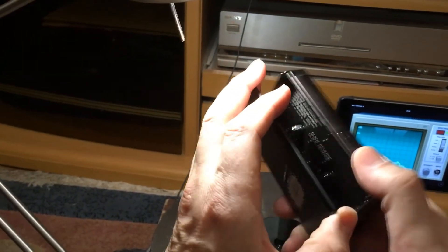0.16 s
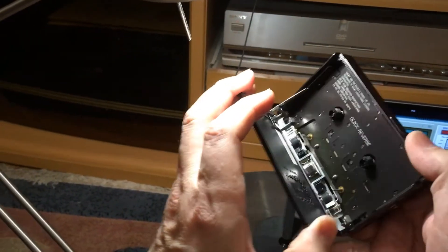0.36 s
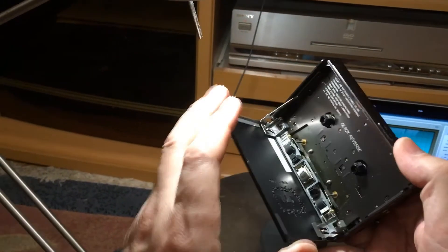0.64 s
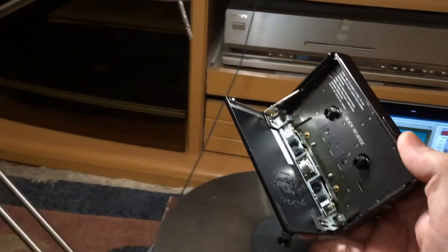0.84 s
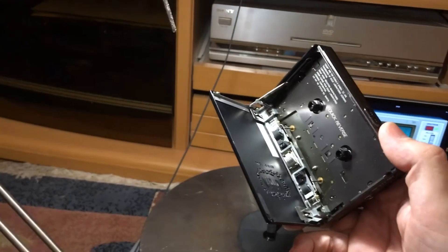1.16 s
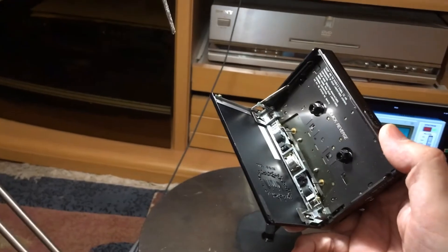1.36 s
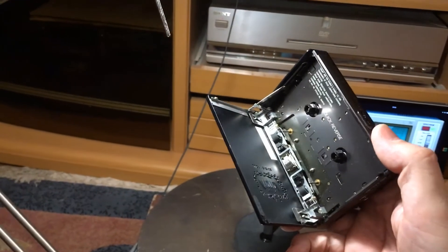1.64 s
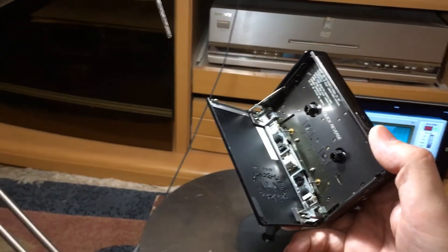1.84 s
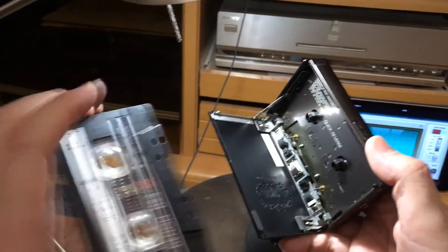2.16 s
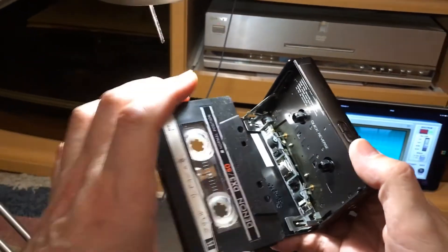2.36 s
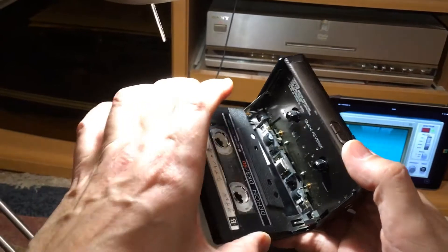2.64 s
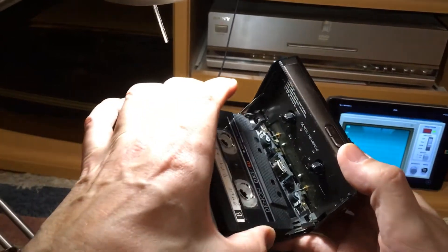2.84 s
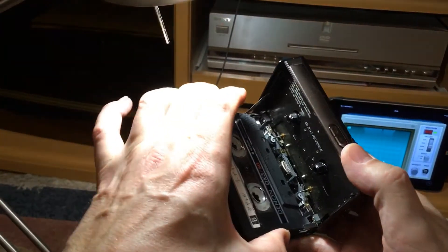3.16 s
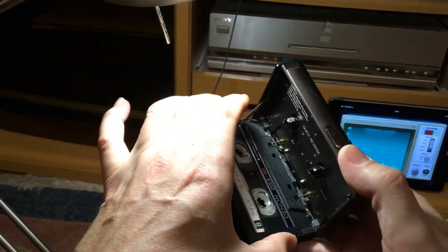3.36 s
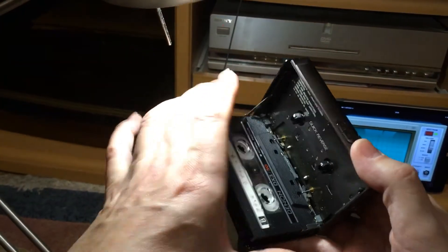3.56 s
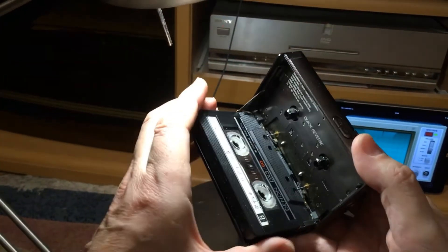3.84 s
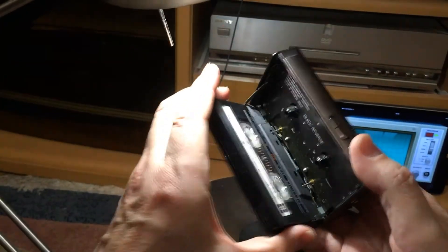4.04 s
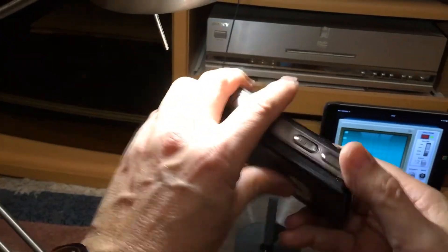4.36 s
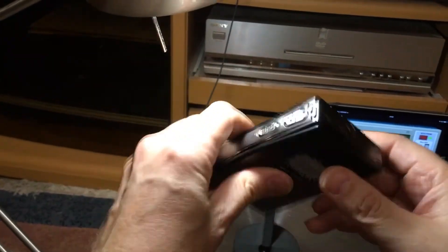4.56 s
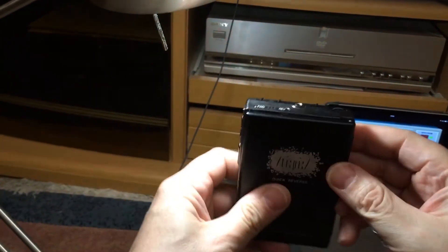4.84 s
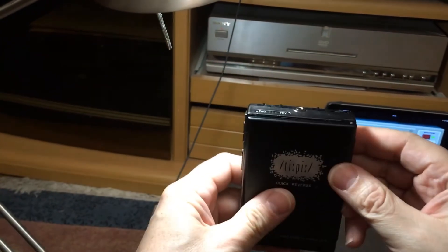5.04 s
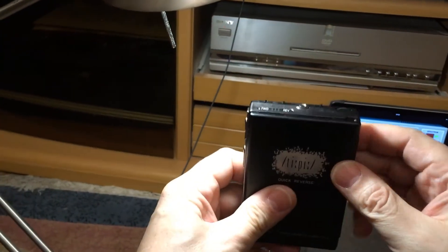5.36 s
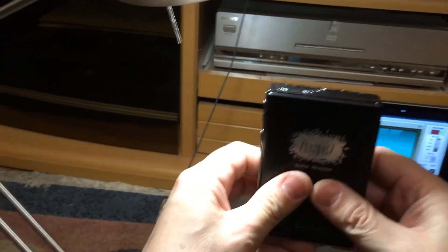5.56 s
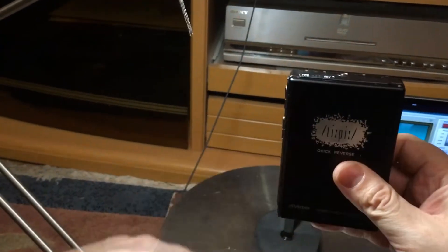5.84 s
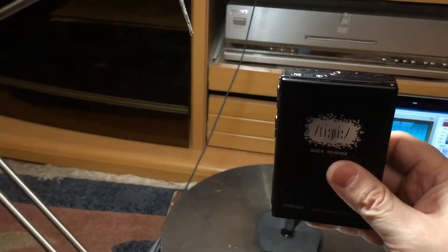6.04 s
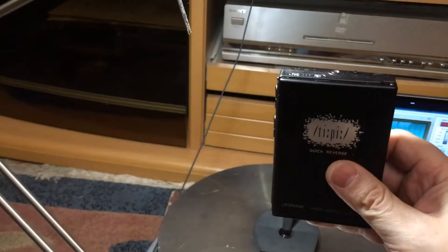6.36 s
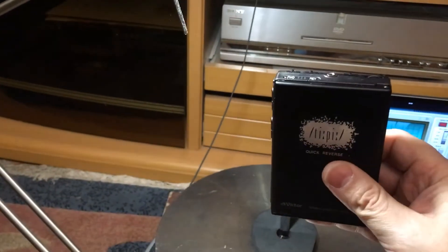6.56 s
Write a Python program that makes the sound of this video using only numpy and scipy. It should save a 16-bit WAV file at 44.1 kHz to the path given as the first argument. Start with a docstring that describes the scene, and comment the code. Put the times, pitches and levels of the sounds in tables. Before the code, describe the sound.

A hand rubs over a pocket cassette player and its latch opens with a sharp, bright click. Small plastic ticks follow as the door is handled. A cassette slides in with a brief hollow clatter and scrape, then fingers brush the case and the door shuts with a firm snap. A few lighter clicks trail off. The sounds are close, over the faint rumble and hiss of a small quiet room.

```python
"""A finger brushes plastic over the rumble and hiss of a quiet room: a hand opens a pocket cassette
player, fetches a cassette, slides it into the door and shuts it. Latches, door and cassette click in
bursts of micro-impacts; skin and plastic rub by stick-slip. Both ring one hollow shell, and small
parts ring at their own pitch. The floor thumps softly once; a faint whine enters near the end."""
import sys
import numpy as np
from scipy import signal
from scipy.fft import rfft, irfft
from scipy.io import wavfile

SR = 44100
rng = np.random.default_rng(int(sys.argv[2]) if len(sys.argv) > 2 else 0)


def store_wav(level_fs):
    """Save 16-bit WAV to argv[1]."""
    pcm = np.round(np.clip(np.atleast_2d(level_fs), -1, 1) * 32767)
    wavfile.write(sys.argv[1], SR, pcm.T.astype(np.int16))


N = 295451
TIME_S = np.arange(N) / SR
REGISTER_EDGES_HZ = (520, 2200, 7000, 16500)   # three registers: hollow, plastic, bright


def from_db(db):
    """Decibels to gain."""
    return 10 ** (np.asarray(db) / 20)


def unit_rms(x):
    """Scale to rms 1."""
    return x / np.sqrt(np.mean(x ** 2) + 1e-20)


def drift(rate_hz):
    """Smooth random wander, rms about 1."""
    step, warmup = 40, 2000
    pole = np.exp(-2 * np.pi * rate_hz * step / SR)
    noise = rng.standard_normal(N // step + warmup + 2)
    slow = signal.lfilter([1], [1, -2 * pole, pole * pole], noise)[warmup:]
    return np.interp(np.arange(N) / step, np.arange(len(slow)), unit_rms(slow))


def band(x, low_hz, high_hz):
    """Butterworth band-pass."""
    return signal.sosfilt(signal.butter(3, [low_hz, high_hz], "band", fs=SR, output="sos"), x)


def ring(force, hz, t60_s):
    """One damped mode; about unit power gain for white force."""
    pole, angle = from_db(-60 / (t60_s * SR)), 2 * np.pi * hz / SR
    gain = np.sin(angle) * np.sqrt(2 * (1 - pole * pole))
    return signal.lfilter([0, gain], [1, -2 * pole * np.cos(angle), pole * pole], force + 1e-18)


def coloured_noise(spectrum):
    """Noise shaped by (Hz, dB) points, rms 1."""
    hz = np.maximum(np.arange(N // 2 + 1) * SR / N, 1)
    points_hz, points_db = np.transpose(spectrum)
    gain = from_db(np.interp(np.log(hz), np.log(points_hz), points_db))
    return unit_rms(irfft(rfft(rng.standard_normal(N)) * gain, N))


def room_tail(x, db, t60_s):
    """Diffuse tail of a small furnished room; the first wall answers after 4 ms."""
    t = np.arange(SR // 2) / SR
    tail = rng.standard_normal(len(t)) * from_db(-60 * t / t60_s) * (t > 0.004)
    return from_db(db) * signal.fftconvolve(x, tail / np.sqrt(np.sum(tail ** 2)))[:N]


# Rumble level. Each row: time in seconds, level in dB.
RUMBLE_LEVELS = [(0.0, -61), (1.06, -59.5), (1.34, -56), (1.68, -63), (1.9, -65.5), (2.29, -56),
                 (3.23, -61.5), (3.73, -65), (4.18, -60), (4.57, -62.5), (4.7, -68), (4.94, -65.5),
                 (5.39, -59.5), (5.76, -56), (6.12, -64.5), (6.7, -60)]
# Rumble spectrum. Each row: frequency in Hz, relative density in dB.
RUMBLE_SPECTRUM = [(20, -26), (33, -17), (45, -2.5), (54, 5), (70, -5), (100, -3), (160, -11), (217, -8),
                   (400, -20.5), (650, -28.5), (1500, -46.5)]


def rumble(waver_db):
    """Low room noise; the level wavers slowly about its curve."""
    level_db = np.interp(TIME_S, *np.transpose(RUMBLE_LEVELS)) + waver_db * drift(1.7)
    return from_db(level_db) * coloured_noise(RUMBLE_SPECTRUM)


# Hiss spectrum. Each row: frequency in Hz, relative density in dB.
HISS_SPECTRUM = [(200, -41), (350, 3), (1500, -3), (3500, -7.5), (5000, -10), (8000, -10.5), (10500, -10.5),
                 (13000, -7), (15500, -9), (16000, -39.5)]


def hiss(rms_db):
    """Steady broadband background."""
    return from_db(rms_db) * coloured_noise(HISS_SPECTRUM)


# Modes of shell, door and mechanism. Each row: frequency in Hz, gain in dB, t60 in seconds.
SHELL_MODES = [(570, -29, 0.086), (1057, -12, 0.075), (1337, -2.5, .025), (1473, 2, 0.059),
               (1615, 0.5, 0.042), (2090, -2, 0.018), (2553, -2.5, 0.017), (2928, -4, 0.015),
               (3454, -2.5, 0.01), (3710, -3, 0.0081), (4290, -4, 0.0055), (4600, -9, .01),
               (5503, -14, 0.012), (5964, -18, 0.015), (6905, -25, 0.012), (8250, -4.5, 0.0056),
               (9600, -5.5, 0.018), (10350, -15.5, 0.0091), (11420, -18.5, 0.015), (11000, -12, 0.015),
               (12160, -11, 0.015), (14000, -14.5, 0.0036), (15100, -24.5, 0.011)]


def shell_modes(register):
    """The shell's resonances within one register."""
    low_hz, high_hz = REGISTER_EDGES_HZ[register:register + 2]
    return [(hz, db, t60_s) for hz, db, t60_s in SHELL_MODES if low_hz <= hz < high_hz]


# Direct band per register. Each row: low edge in Hz, high edge in Hz.
DIRECT_BANDS_HZ = [(750, 2300), (2100, 7600), (7200, 16300)]


def direct(force, register):
    """Sound that the shell radiates without ringing."""
    return band(force, *DIRECT_BANDS_HZ[register])


def stick_slip(slips_per_s, size_db, clump_db):
    """Friction force: dense, uneven slips whose strength comes in clumps."""
    sizes = from_db(size_db * np.minimum(rng.exponential(1, N), 5))
    signs = rng.choice([-1, 1], N)
    slipping = rng.random(N) < slips_per_s / SR
    return sizes * signs * slipping * from_db(clump_db * drift(52))


def rubbing(register, slips, ringing_db, wander_db=3):
    """Slips heard directly and through shell modes that each swell on their own; rms 1."""
    ringing = sum(from_db(db + wander_db * drift(3.1)) * ring(slips, hz, t60_s)
                  for hz, db, t60_s in shell_modes(register))
    return unit_rms(unit_rms(direct(slips, register)) + from_db(ringing_db) * unit_rms(ringing))


def pressure(start_s, length_s, swell_db, attack_s, release_s):
    """Envelope of one movement: sets in, swells or sags evenly in dB, lets go."""
    elapsed_s = TIME_S - start_s
    progress = np.clip(elapsed_s / length_s, 0, 1)
    held = np.clip(np.minimum(elapsed_s / attack_s, 1 + (length_s - elapsed_s) / release_s), 0, 1)
    return held ** 2 * from_db(swell_db * (progress - 0.5))


# Finger strokes. Each row: start and length in seconds, hollow, plastic and bright
# mid-stroke levels in dB, swell over the stroke in dB.
FINGER_STROKES = [(-0.03, 0.052, -53.5, -50, -51, -42), (0.14, 0.24, -80, -64, -60, 5),
                  (0.41, 0.1, -71, -70, -68, 18), (0.5, 0.19, -70, -66.5, -66, 3.5),
                  (0.68, 0.19, -67.5, -62, -59.5, 0.5), (0.89, .1, -72, -72, -65, -3),
                  (2.15, 0.59, -99, -91.5, -83, 13), (3.73, 0.18, -74.5, -73, -73, -7),
                  (4.02, 0.055, -64, -70, -67.5, 8), (4.1, 0.2, -68.5, -63.5, -59, 2),
                  (4.31, 0.19, -64.5, -59.5, -53, 3), (4.52, 0.16, -78, -61.5, -59.5, 0),
                  (4.7, 0.128, -95, -82, -78.5, -20), (5.31, 0.28, -71.5, -65.5, -65.5, -3.5),
                  (5.58, 0.14, -70.5, -63.5, -62.5, 11.5), (5.75, 0.08, -92, -76, -69.5, -7),
                  (6.05, .3, -102.5, -86, -77.5, 2), (6.35, 0.31, -85, -82, -81, 13)]


def finger_strokes(register, slips):
    """Skin slides over plastic: soft onset, little ringing."""
    gain = sum(from_db(levels_db[register])
               * pressure(start_s, length_s, swell_db, attack_s=0.02, release_s=0.069)
               for start_s, length_s, *levels_db, swell_db in FINGER_STROKES)
    return gain * rubbing(register, slips, ringing_db=-6)


# Contacts of latches, door and cassette. Each row: start in seconds, burst energy in dB, shares of
# hollow knock, plastic tick and metal snap in dB, chatter t60 in ms, part pitch in Hz, part share in dB.
CLICKS = [(0.055, -58, -11, 4.5, -17, 13, 2440, -13), (0.137, -47.5, 7.5, -34, -9, 8, 1300, -6),
          (0.15, -46, 10, -7, -13, 17, 1220, -11), (0.186, -43, -23, -14, -14, 5.7, 3600, 2),
          (0.193, -43, -39.5, -11, -15, 8, 14500, -6), (0.218, -35.5, -34, -14, -2.5, 12, 11800, -19),
          (0.255, -39, -44, -15, -1, 15, 11800, -10), (0.353, -44, -30.5, -19, -1, 3.3, 11900, -6),
          (0.3995, -27, -30, -6.5, -2, 12, 5800, -4), (0.406, -28, -8, -15, -24, 14, 2580, 11),
          (0.4794, 0.5, -13.5, -18.5, -8, 16, 13600, 7.5), (0.698, -32, -8, -18, -17, 4, 3370, 6),
          (0.711, -33, -5.5, -19, -17, 6.5, 13800, -9), (0.721, -36.5, 5, -18, -16, 6.4, 1380, -18),
          (0.859, -50, -25, -20, 3, 5.4, 14600, -4), (0.956, -33, -34, -36, -6, 8.5, 14400, -2),
          (0.973, -29.5, -40, -52, -2.5, 10.1, 12570, 9.5), (1.234, -30.5, -9, -12.5, -23, 14, 1480, -1),
          (1.247, -31, -13, -26.5, -14, 18, 980, 6.5), (1.679, -40, 10, -22, -30, 20, 1300, -5),
          (1.8197, -30, -15, -19.5, -30, 15, 1400, -3), (1.833, -28, -12, -15, -31, 12, 1350, 5),
          (1.857, -25, -5, -29, -19, 17, 1180, 0), (1.87, -38.5, 6, -32, -25, 4, 684, 1.5),
          (2.086, -28, -1, -12.5, -9, 16, 6440, -1), (2.094, -23.5, -9.5, -11.5, -23, 20, 1400, 3),
          (2.111, -31, -3, -16, -27.5, 7.3, 1320, -6), (2.118, -41, -17, -24.5, -31, 6.3, 1380, -5),
          (2.222, -41, -18, -46.5, -2.5, 27, 11600, 10.5), (2.335, -44, -16, -34, -6, 11, 12900, 5),
          (2.435, -53, -18, -17, 0, 8.9, 12200, -5.5), (2.828, -36.5, -0.5, -6.5, -26, 12.3, 2630, 4),
          (2.86, -45, -14, -9, -4, 10.5, 5890, 6), (2.873, -32.5, -33, -9, -7, 13, 6200, 15.5),
          (3.019, -32, -32, -2, 0, 16, 3760, 9.5), (3.154, -36.5, -24, -28, -5.5, 8.9, 6460, 9),
          (3.238, -35, -10, -12, -20, 8, 1250, -7), (3.257, -27.5, -24, -10, -3, 6.9, 1270, -10),
          (3.268, -21, -18, -4.5, -19, 46, 1340, 4), (3.291, -16.5, -10.5, -10.5, -7.5, 11, 1330, -3),
          (3.32, -23, -42, 1, -29, 12, 1360, -19), (3.558, -36, -10, -17.5, -11, 6.3, 1440, 5),
          (3.567, -24.5, -34, -11, -12, 15, 1430, -1), (3.574, -21.5, -8, -23.5, -16, 5.9, 1390, -8),
          (3.734, -50.5, -23, -23, -3, 7.3, 1055, -3), (3.755, -47, -23, -5, -11, 13, 5180, -15),
          (3.804, -35, 9, -6.5, -13.5, 19, 1570, -4.5), (4.034, -40, 3.5, -17, -26, 7.4, 1410, -11),
          (4.05, -39, -2, -11.5, -22, 7.3, 1330, -7.5), (4.093, -23.5, -5, -17, -7, 2.4, 8200, 8),
          (4.107, -27.5, -28, -19, -5, 6.5, 12600, 8), (4.131, -43, -27, -24, -2, 8, 11900, -6),
          (4.314, -35, -30, -9.5, -13, 13, 11500, 16), (4.334, -40, -30, -34, -10, 8, 13500, -6),
          (4.384, -39, -15, -3, -20, 8, 3000, 0), (4.413, -34, -17, -14, -0.5, 11, 11800, -8),
          (4.424, -26.5, -3.5, -13.5, -13, 14, 13900, 3), (4.49, -21, -15, -44, -30, 46, 13000, 16.5),
          (4.499, -28, -23, -19, -11, 3.2, 13000, 9), (4.508, -28.5, 3, -44, -21, 3.2, 13000, 6),
          (4.679, -38.5, -35, 0.5, -14, 3.1, 1480, -10), (4.794, -50.5, 9, -6.5, -18, 20, 1490, 1),
          (4.832, -48.5, -27, -27, -2, 7.6, 13300, -5), (4.873, -49.5, -11, -13, -7, 11, 1280, 4),
          (4.97, -36.5, 4, -9.5, -14, 21, 1150, 5), (5.193, -46, 10, -33, -34, 9.2, 1017, -2),
          (5.2947, -11.5, -7, -17, -5.5, 7.3, 1290, 5), (5.297, -7.5, -3.5, -10.5, -5, 15, 4600, -2),
          (5.377, -29, -15, -28, -13, 9.3, 9400, 0), (5.378, -36.5, -35, -10, -25, 17, 7240, 12),
          (5.588, -35.5, -12, -16, -16.5, 12, 2340, 5), (5.64, -40, -8, -13, -20, 8, 1280, 2),
          (5.668, -40, -23, -9, -7, 8, 6160, 9), (5.685, -30, -32, -9.5, -18, 18, 2280, 13.5),
          (5.695, -28, -30, -9, -23, 3.6, 12500, 9), (5.7, -26.5, -15, -18, -8, 7.3, 13900, -2),
          (5.732, -26, -11.5, -15, -15, 5.4, 14600, 12), (5.816, -43.5, -32, -22, -5, 9.3, 14400, 12),
          (5.897, -37, -33, -43, -18, 9, 13150, 3.5), (6.347, -41.5, 0, -15, -32.5, 10.2, 1260, -8)]


def clicks(rise_ms, part_cycles, spread_db, crack_db):
    """Bursts of micro-impacts ring the struck parts and the shell; returns parts, shell per register."""
    start_s, energy_db, *shares_db, chatter_ms, part_hz, part_db = np.transpose(CLICKS)
    offsets = np.arange(1024)
    t_ms = 1000 * offsets / SR
    bursts = np.abs(rng.standard_normal((len(CLICKS), len(offsets))))   # all push one way
    bursts *= from_db(-60 * t_ms / np.clip(chatter_ms[:, None], 1, 40))
    bursts *= np.minimum(t_ms / rise_ms, 1)
    bursts *= from_db(energy_db[:, None]) / np.linalg.norm(bursts, axis=1, keepdims=True)
    samples = np.minimum((start_s[:, None] * SR).astype(int) + offsets, N - 1)

    def place(sounds, gains):
        """Sum one short sound per contact onto the timeline."""
        return np.bincount(samples.ravel(), (sounds * gains[:, None]).ravel(), N)

    pings = np.array([ring(burst, hz, part_cycles / hz) for burst, hz in zip(bursts, part_hz)])
    parts = band(place(pings, from_db(part_db)), 600, 16500)
    shell = []
    for register, response_db in enumerate((-5, 12, 11.5)):
        gains = from_db(shares_db[register] + response_db)
        modes = shell_modes(register)
        # Each contact drives each mode with its own strength.
        strengths = from_db(spread_db * rng.standard_normal((len(CLICKS), len(modes))))
        strengths /= np.sqrt(np.mean(strengths ** 2, axis=1, keepdims=True))
        crack = from_db(crack_db) * direct(place(bursts, gains), register)
        ringing = sum(from_db(db) * ring(place(bursts, gains * strength), hz, t60_s)
                      for (hz, db, t60_s), strength in zip(modes, strengths.T))
        low_hz = 0.8 * REGISTER_EDGES_HZ[register]   # nothing radiates far below its modes
        shell.append(band(crack + ringing, low_hz, 16700))
    return parts, shell


# Short scrapes. Each row: start and length in seconds, hollow, plastic and bright
# mid-scrape levels in dB, swell over the scrape in dB.
PART_SCRAPES = [(0.18, 0.017, -70, -60.5, -73, -9), (0.396, 0.012, -47.5, -50, -52, -3),
                (0.95, .04, -76, -78, -63, 0), (1.225, 0.051, -57, -62.5, -57, -3),
                (1.82, 0.0075, -42, -60.5, -58.5, -6), (1.832, 0.012, -46.5, -54.5, -58, -4.5),
                (1.85, 0.026, -61, -64.5, -61.5, -10), (2.172, 0.018, -73, -68, -61, -7),
                (2.095, 0.026, -44, -62, -60, -29), (2.87, 0.013, -56, -52.5, -58, -10),
                (3.254, 0.054, -42, -44, -42, -1), (3.316, 0.018, -38.5, -59, -47, -15),
                (3.56, 0.02, -54, -46, -50.5, 3), (4.088, 0.021, -56.5, -59, -55, -9),
                (4.312, 0.061, -70, -79, -52.5, 0), (4.487, 0.025, -51, -48, -43, -24.5),
                (4.67, 0.029, -61.5, -70, -66, -6), (5.68, 0.023, -80, -58.5, -59, 3),
                (5.728, 0.011, -62, -50, -51, -7)]


def scrapes(register, slips):
    """Cassette, door and latch scrape: fast onset, strong shell ringing."""
    gain = sum(from_db(levels_db[register])
               * pressure(start_s, length_s, swell_db, attack_s=0.0035, release_s=0.01)
               for start_s, length_s, *levels_db, swell_db in PART_SCRAPES)
    return gain * rubbing(register, slips, ringing_db=1.5)


# Pitched rasps. Each row: start and length in seconds, pitch in Hz, mid-rasp level in dB, swell in dB.
PART_RASPS = [(0.22, 0.063, 4770, -72, -18), (0.308, 0.095, 12100, -57.5, 2),
              (2.096, 0.032, 1410, -47.5, -12), (3.261, 0.034, 1310, -38, 6), (3.33, 0.025, 1360, -51, -6),
              (3.561, 0.029, 1440, -48.5, -9), (3.744, 0.028, 5400, -74, 0), (4.123, 0.13, 6500, -79, -2),
              (4.13, 0.13, 12500, -65.5, -16), (4.323, 0.037, 13500, -50, -1), (4.38, .1, 13400, -68, 0),
              (4.537, 0.15, 3330, -77, 13)]


def rasps(slips, t60_cycles):
    """A fingertip or edge drags over one small part; the slips drive its single resonance."""
    out = np.zeros(N)
    for start_s, length_s, hz, db, swell_db in PART_RASPS:
        gain = from_db(db) * pressure(start_s, length_s, swell_db, attack_s=0.0035, release_s=0.015)
        out += gain * unit_rms(ring(slips, hz, t60_cycles / hz))
    return out


# Low floor modes. Each row: frequency in Hz, initial level in dB, t60 in seconds.
FLOOR_MODES = [(61, -46, 0.36), (133.7, -44.5, 0.223), (176, -53, 0.17)]


def floor_thump(start_s):
    """One soft bump sets the floor ringing."""
    t = np.maximum(TIME_S - start_s, 0)
    return sum(from_db(db - 60 * t / t60_s) * np.sin(2 * np.pi * hz * t) for hz, db, t60_s in FLOOR_MODES)


# Whine tones. Each row: frequency in Hz, median amplitude in dB.
WHINE_TONES = [(1653, -83), (2600, -84), (3865, -86), (5373, -83), (6826, -88)]


def whine(start_s, fade_s, flutter_db):
    """Faint thin tones, each fluttering in level."""
    tones = sum(from_db(db + flutter_db * drift(30)) * np.sin(2 * np.pi * hz * TIME_S)
                for hz, db in WHINE_TONES)
    return tones * np.clip((TIME_S - start_s) / fade_s, 0, 1)


def scene():
    """Mono mix of background and handling; clicks and scrapes feed the room tail."""
    fine_slips = stick_slip(slips_per_s=5000, size_db=1.2, clump_db=1.2)
    rough_slips = stick_slip(slips_per_s=9000, size_db=2.5, clump_db=2)
    parts, shell = clicks(rise_ms=0.4, part_cycles=16, spread_db=2.5, crack_db=8)
    out = rumble(waver_db=2) + hiss(rms_db=-71.5)
    out += parts + room_tail(parts, db=-12.5, t60_s=0.079)
    for register, (room_db, room_t60_s) in enumerate([(-9, 0.25), (-13.5, 0.14), (-18, 0.17)]):
        out += finger_strokes(register, fine_slips)
        clatter = shell[register] + scrapes(register, rough_slips)
        out += clatter + room_tail(clatter, room_db, room_t60_s)
    out += rasps(fine_slips, t60_cycles=48)
    out += floor_thump(start_s=1.236)
    out += whine(start_s=6.5, fade_s=0.033, flutter_db=7)
    return out[None]


def record(dry):
    """Steep low-pass, 60 dB down at 16.8 kHz."""
    return signal.sosfilt(signal.cheby2(12, 60, 16800, fs=SR, output="sos"), dry)


dry = scene()
out = record(dry)
store_wav(out)
```